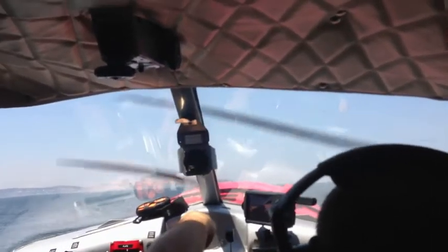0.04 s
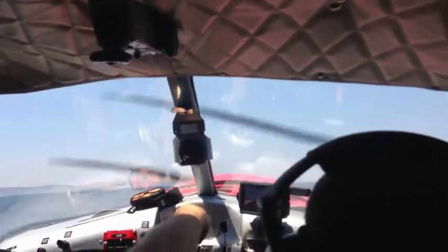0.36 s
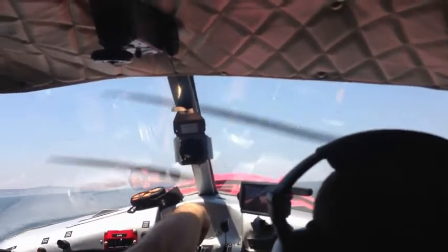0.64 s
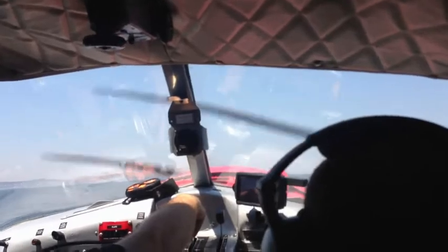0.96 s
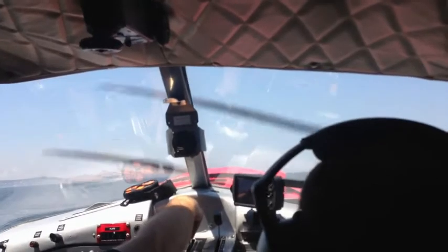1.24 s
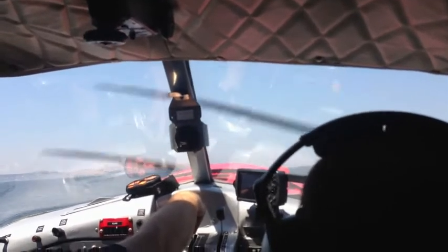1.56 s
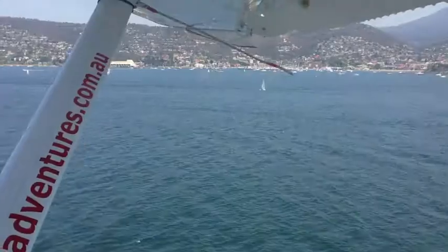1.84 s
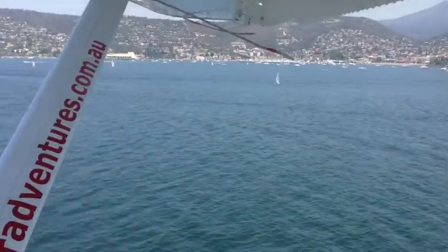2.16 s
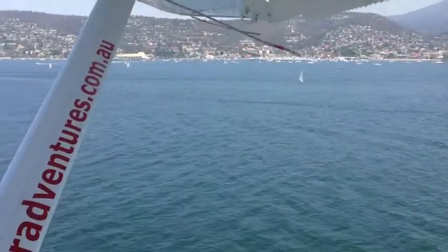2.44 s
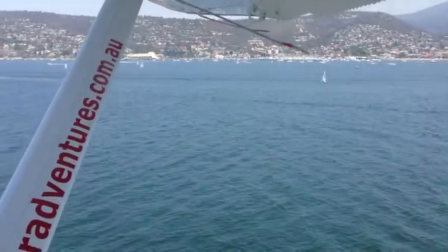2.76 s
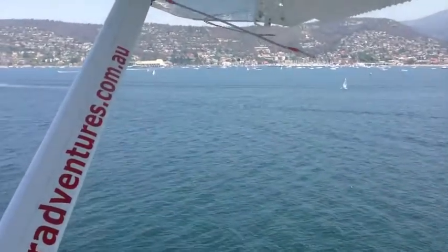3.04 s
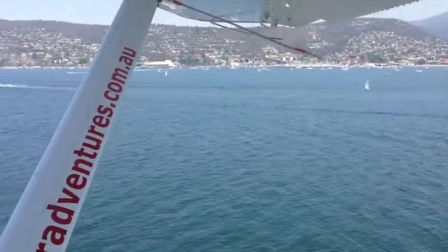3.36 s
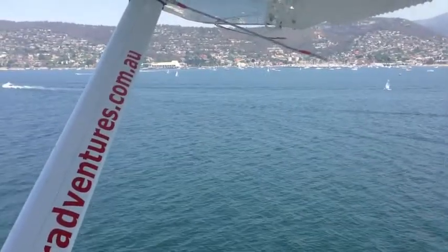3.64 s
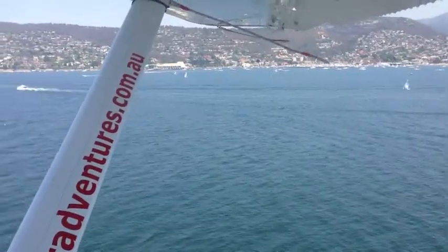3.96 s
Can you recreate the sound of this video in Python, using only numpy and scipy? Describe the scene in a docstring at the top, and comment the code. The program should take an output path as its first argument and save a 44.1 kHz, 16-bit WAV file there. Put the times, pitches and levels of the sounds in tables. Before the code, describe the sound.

From inside the cabin, a small plane's engine and propeller roar through a take-off run, with pulsing hiss and faint water thumps. An abrupt cut leads to a lower, booming cruise drone with gentler air noise.

```python
"""Inside the cabin of a seaplane with a nine-cylinder radial engine and a three-blade propeller.
First the take-off run at full power: exhaust and propeller tones in a roar of air and spray that
pulses with blades and firings. Gears whine, fittings squeak, the floats thump less as they rise.
At 1.8 s comes a short silent cut. Then the plane cruises at lower engine speed:
one cabin boom dominates and the rush is softer."""
import sys
import numpy as np
from scipy import signal
from scipy.fft import rfft, irfft
from scipy.io import wavfile
from scipy.ndimage import uniform_filter1d, minimum_filter1d

SR = 44100
rng = np.random.default_rng(int(sys.argv[2]) if len(sys.argv) > 2 else 0)


def store_pcm(level_fs):
    """Save levels as 16-bit WAV."""
    pcm = np.round(np.clip(level_fs, -1, 1) * 32767).astype(np.int16)
    wavfile.write(sys.argv[1], SR, np.atleast_2d(pcm).T)


N = 176400

# Full-power tones: (order [x cycle rate], relative level [dB]); 9 is firing, 6 and 12 propeller
RUN_ORDERS = [(5, -29), (6, -10.5), (7, -11), (8, -15.5), (9, 0.5), (10, -27), (11, -20.5), (12, -3.5),
              (13, -14.5), (14, -16.5), (15, -13), (16, -11.5), (17, -17), (18, -14), (19, -12),
              (20, -11.5), (21, -22.5), (22, -25), (23, -15), (24, -16.5), (25, -23.5), (26, -18),
              (27, -20.5), (28, -20), (29, -29), (30, -27.5), (31, -23.5), (32, -29), (33, -28),
              (34, -20.5), (35, -25), (36, -26)]
# Exhaust grows, propeller eases with speed: (time [s], firing gain [dB], second blade tone gain [dB])
RUN_SWELL = [(0, -2.5, 2.5), (0.15, -7, 0.5), (0.33, -2.2, 4), (0.42, -3, 2.7), (0.55, -4, 0.8),
             (0.7, -3.2, 1.5), (0.85, -4, 3), (1.05, 0.6, -0.2), (1.3, 3.1, -1), (1.45, 5, -3),
             (1.62, -0.2, -10), (1.81, 3.2, -2.5)]
# Growl of the upper orders: (time [s], gain [dB])
RUN_GROWL = [(0, 5), (.2, -1), (.4, -1.5), (.6, -2), (.85, -2), (1.05, 1), (1.35, 0), (1.55, 0), (1.8, 3.5)]


def run_engine(angle, cylinders=9, blades=3, growl_from_order=14):
    """Exhaust and propeller tones at full power."""
    firing_db, blade_db = in_time(RUN_SWELL)
    growl_db = in_time(RUN_GROWL)[0]
    swell_db = {order: growl_db for order, _ in RUN_ORDERS if order >= growl_from_order}
    blade_order = 2 * blades  # two turns per cycle
    swell_db.update({cylinders: firing_db, 2 * blade_order: blade_db})
    return engine_tones(angle, RUN_ORDERS, swell_db, level_db=-12, weak_db=-2,
                        rough=0.074, weak_rough=0.28, flutter_hz=5.5)


# Cruise tones: (order [x cycle rate], relative level [dB])
CRUISE_ORDERS = [(6, -33), (7, -21.5), (8, -25), (9, -8.5), (10, -21), (11, -.5), (12, -11.5), (13, -18),
                 (14, -28), (15, -29), (16, -32), (17, -32), (18, -26.5), (19, -37), (20, -32), (21, -39.5),
                 (22, -31), (23, -39.5), (24, -37.5), (25, -35), (26, -31), (27, -28.5), (28, -26.5),
                 (29, -34), (30, -34), (31, -26.5), (32, -36), (33, -33.5), (34, -36.5), (35, -40.5),
                 (36, -38.5)]


def cruise_engine(angle):
    """Throttled back; order 11 booms in the cabin."""
    return engine_tones(angle, CRUISE_ORDERS, {}, level_db=-7, weak_db=-2.5,
                        rough=0.05, weak_rough=0.32, flutter_hz=6)


def engine_tones(angle, orders, swell_db, level_db, weak_db, rough, weak_rough, flutter_hz):
    """Harmonics of the engine cycle; the weak ones flutter most."""
    out = 0
    for order, db in orders:
        weakness = np.clip(-db / 20, 0, 1)
        gain = from_db(level_db + db + weakness * weak_db + swell_db.get(order, 0))
        out += gain * partial(order * angle, rough + weakness * weak_rough, flutter_hz)
    return out


def exhaust_rasp(angle, spectrum, level_db=-4.5, size=4096):
    """High overtones of random strength that repeat each engine cycle and fade into the rush."""
    orders = np.arange(37, 130)
    cycle_hz = angle[-1] / (2 * np.pi) * SR / N
    strength = from_db(at_hz(spectrum, orders * cycle_hz) + level_db)
    strength *= np.sqrt(cycle_hz * orders[0] / orders)
    lines = np.zeros(size // 2 + 1, complex)
    lines[orders] = strength * (rng.standard_normal((len(orders), 2)) @ [1, 1j])
    one_cycle = irfft(lines) * size / 2
    return np.interp(angle / (2 * np.pi), np.arange(size) / size, one_cycle, period=1)


# Rush spectrum on the water: (frequency [Hz], density [dB per Hz])
RUN_RUSH = [(25, -66), (72, -62.5), (95, -63), (118, -46), (160, -34), (230, -38.5), (300, -45),
            (380, -42.5), (500, -47), (650, -52), (850, -55.5), (1100, -59), (1450, -56.5), (1700, -60.5),
            (2150, -60), (2550, -64.5), (3600, -65), (4600, -68.5), (6300, -73.5), (9000, -79.5),
            (12000, -83.5), (15000, -85.5)]
# Hiss wavering: (time [s], gain [dB])
RUN_WAVER = [(0.0, 0), (0.06, 5), (0.11, -3), (0.16, 1.0), (0.23, -1.8), (0.34, 0), (0.46, -2.2),
             (0.53, -2.8), (0.57, 3), (0.62, -3.5), (0.71, 0.2), (0.84, -1.8), (0.99, 2), (1.11, -2),
             (1.21, 3), (1.34, 0), (1.43, 1), (1.53, -3.5), (1.6, 0), (1.81, -0.2)]
# Hiss pulsing: (order [x cycle rate], depth [0-1])
RUN_PULSING = [(1, 0), (6, 0.08), (8, 0.07), (9, 0.09), (18, 0.1)]


def run_rush(angle):
    """Roar of air, spray and exhaust through the cabin walls."""
    return rush(angle, RUN_RUSH, RUN_WAVER, RUN_PULSING, rumble_db=-1.5, flicker_db=0.86, flicker_hz=18)


# Rush spectrum in flight: (frequency [Hz], density [dB per Hz])
CRUISE_RUSH = [(25, -67.5), (88, -60), (110, -53), (135, -42), (175, -37.5), (215, -40), (260, -51),
               (350, -57), (480, -54.5), (560, -57.5), (680, -64.1), (950, -62.5), (1080, -68),
               (1220, -66.5), (1550, -71), (1850, -68.5), (2400, -72.5), (3000, -72), (4500, -78.0),
               (6500, -82), (8500, -88), (11000, -92), (15000, -99.0)]
# Hiss wavering: (time [s], gain [dB])
CRUISE_WAVER = [(1.87, 5), (2.0, -1.1), (2.14, 1), (2.23, -1), (2.38, 1.3), (2.52, -1.7), (2.67, 3),
                (2.76, -1.5), (2.79, 0), (2.9, -0.8), (2.94, 1.5), (3.03, -1.5), (3.18, 1.4), (3.22, -0.9),
                (3.29, 0.8), (3.36, -0.6), (3.56, 2.5), (3.65, -1.7), (3.72, 0.7), (3.98, 0.1)]
# Hiss pulsing: (order [x cycle rate], depth [0-1])
CRUISE_PULSING = [(1, 0.054), (2, .04), (9, 0.056), (11, 0.055), (20, 0.089)]


def cruise_rush(angle):
    """Softer rush of air and exhaust in flight."""
    return rush(angle, CRUISE_RUSH, CRUISE_WAVER, CRUISE_PULSING,
                rumble_db=0.1, flicker_db=0.5, flicker_hz=20)


# Crossovers between the rumble and four hiss bands: (frequency [Hz])
RUSH_SPLITS_HZ = [300, 900, 2400, 5500]


def rush(angle, spectrum, waver, pulsing, rumble_db, flicker_db, flicker_hz):
    """Turbulence: steady rumble, plus wavering hiss bands chopped by blades and firings."""
    hz = np.arange(N // 2 + 1) * SR / N
    colour = from_db(at_hz(spectrum, hz)) * np.sqrt(SR / 2)
    lowpasses = [1 / (1 + (hz / split) ** 6) for split in RUSH_SPLITS_HZ]
    shares = np.abs(np.diff(lowpasses, axis=0, prepend=0, append=1))
    rumble, *bands = (irfft(rfft(rng.standard_normal(N)) * colour * np.sqrt(s), N) for s in shares)
    waver_db = in_time(waver)[0]
    hiss = 0
    for band, follows in zip(bands, (1, 1, 1, 0.76)):  # top band wavers less
        hiss += band * from_db(follows * (waver_db + flicker_db * drift(flicker_hz)))
    chop = 1 + sum(depth * np.cos(order * angle + rng.uniform(0, 2 * np.pi)) for order, depth in pulsing)
    return from_db(rumble_db) * rumble + chop * hiss


# Squeaks: (middle [s], length [s], pitch [Hz], glide [Hz/s], level [dB])
SQUEAKS = [(0.427, .06, 2230, -600, -32.5), (.76, 0.044, 3510, 1000, -35), (0.918, .07, 2260, 600, -29.5),
           (.97, 0.13, 1500, 1300, -33), (1.01, 0.078, 3680, -900, -36.5), (1.051, 0.077, 2245, -600, -31)]


def squeaks():
    """Cabin fittings: rough gliding tones that swell and die."""
    out = 0
    for middle_s, length_s, hz, glide_hz_per_s, db in SQUEAKS:
        t = np.arange(N) / SR - middle_s
        swell = np.cos(np.pi * np.clip(t / length_s, -0.5, 0.5))
        phase = 2 * np.pi * (hz * t + glide_hz_per_s * t * t / 2)
        out += from_db(db) * swell * partial(phase, rough=0.72, flutter_hz=55)
    return out


# Thumping, weaker as the floats rise: (time [s], level [dB])
FLOAT_THUMP = [(0, -29), (.7, -31), (1.3, -47), (1.81, -43)]


def floats(band_hz=(94, 135)):
    """Low lumpy noise of water beating under the floats."""
    band = signal.butter(2, band_hz, "band", fs=SR, output="sos")
    noise = signal.sosfilt(band, signal.sosfilt(band, rng.standard_normal(N + SR)))[SR:]
    return from_db(in_time(FLOAT_THUMP)[0]) * noise / noise.std()


def gear_whine(hz=6347, level_db=-54, wander=0.0005):
    """Thin tone of the gears at full power."""
    phase = 2 * np.pi * np.cumsum(hz * (1 + wander * drift(5))) / SR
    return from_db(level_db) * partial(phase, rough=0.3, flutter_hz=12)


def cycle_angle(rpm, wander):
    """Slightly unsteady phase of the four-stroke cycle (two crank turns)."""
    cycle_hz = in_time(rpm)[0] / 120
    return 2 * np.pi * np.cumsum(cycle_hz * (1 + wander * drift(8))) / SR


def partial(angle, rough, flutter_hz):
    """Unit-rms tone with fluttering amplitude and phase."""
    angle = angle + rng.uniform(0, 2 * np.pi)
    in_phase = (1 + rough * drift(flutter_hz)) * np.cos(angle)
    quadrature = rough * drift(flutter_hz) * np.sin(angle)
    return (in_phase + quadrature) / np.sqrt(0.5 + rough ** 2)


def drift(rate_hz, hop=100):
    """Unit-spread noise, low-passed at rate_hz."""
    pole = np.exp(-2 * np.pi * rate_hz * hop / SR)
    noise = rng.standard_normal(N // hop + 1002)
    slow = signal.lfilter([1], [1, -2 * pole, pole * pole], noise)[1000:]
    return np.interp(np.arange(N) / hop, np.arange(len(slow)), slow / slow.std())


def from_db(db):
    """Decibels to gain."""
    return 10 ** (np.asarray(db) / 20)


def in_time(rows):
    """Each column of a curve at every sample."""
    time_s, *columns = np.transpose(rows)
    return [np.interp(np.arange(N) / SR, time_s, column) for column in columns]


def at_hz(spectrum, hz):
    """Spectrum level on a log-frequency axis."""
    knots_hz, db = np.transpose(spectrum)
    return np.interp(np.log(np.maximum(hz, 1)), np.log(knots_hz), db)


# Engine speed on the water and in flight: (time [s], speed [rpm])
RUN_RPM = [(0, 2272), (.3, 2264), (1.0, 2266), (1.3, 2260), (1.55, 2249), (1.81, 2238)]
CRUISE_RPM = [(1.86, 2007), (2.4, 2006), (3.0, 2007), (3.5, 2007), (4.0, 2008)]


def scene(run_end_s=1.8136, cruise_start_s=1.8602, fade_s=0.002):
    """Take-off run, short silence, abrupt cut to cruise."""
    angle = cycle_angle(RUN_RPM, wander=0.0006)
    run = run_engine(angle) + run_rush(angle) + gear_whine()
    run += exhaust_rasp(angle, RUN_RUSH) + squeaks() + floats()
    angle = cycle_angle(CRUISE_RPM, wander=0.0007)
    cruise = cruise_engine(angle) + cruise_rush(angle) + exhaust_rasp(angle, CRUISE_RUSH)
    t = np.arange(N) / SR
    run_gate = np.clip(np.minimum(t / fade_s, (run_end_s - t) / fade_s + 0.5), 0, 1)
    return (run * run_gate + cruise * (t > cruise_start_s))[None]


def record(dry, limit_db=-0.66, release_db_per_s=38, window_s=0.0021, cutoff_hz=15400):
    """Look-ahead peak limiter, then a steep low-pass."""
    release_db = release_db_per_s * np.arange(N) / SR
    over_db = np.maximum(20 * np.log10(np.abs(dry[0]) + 1e-9) - limit_db, 0)
    held_db = np.maximum.accumulate(over_db + release_db) - release_db
    span = int(window_s * SR)
    gain = from_db(uniform_filter1d(minimum_filter1d(-held_db, span), span))
    lowpass = signal.ellip(12, 0.1, 90, cutoff_hz, fs=SR, output="sos")
    return signal.sosfilt(lowpass, dry * gain)


dry = scene()
out = record(dry)
store_pcm(out)
```